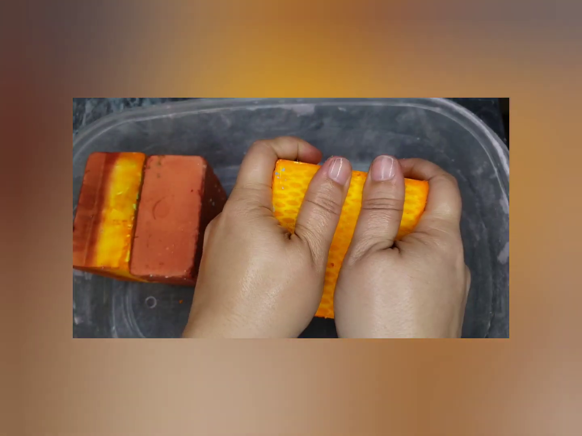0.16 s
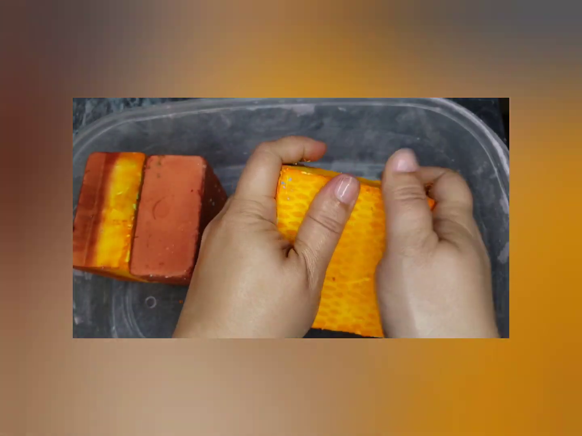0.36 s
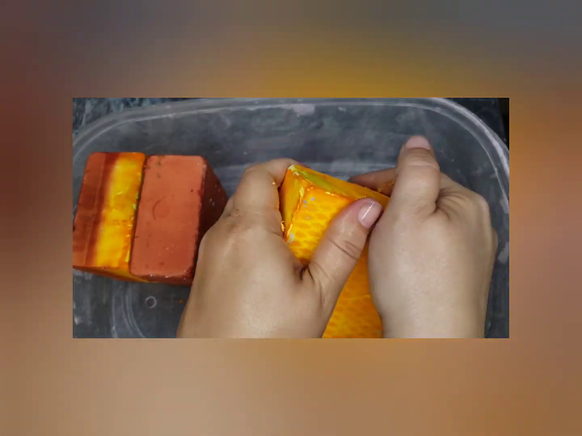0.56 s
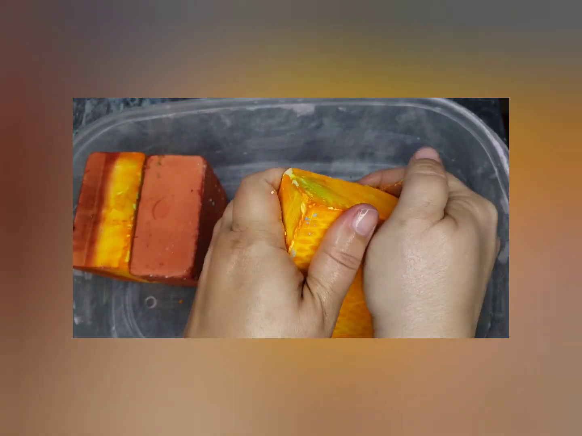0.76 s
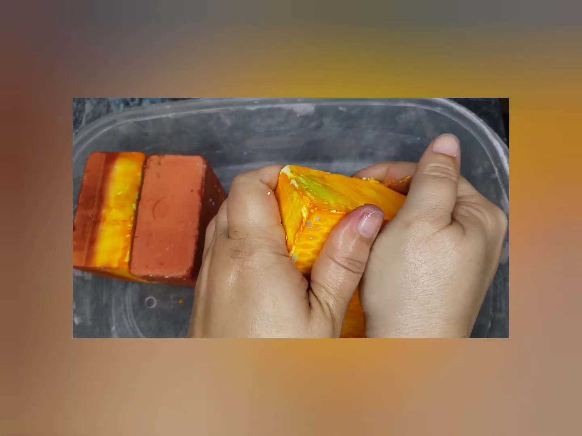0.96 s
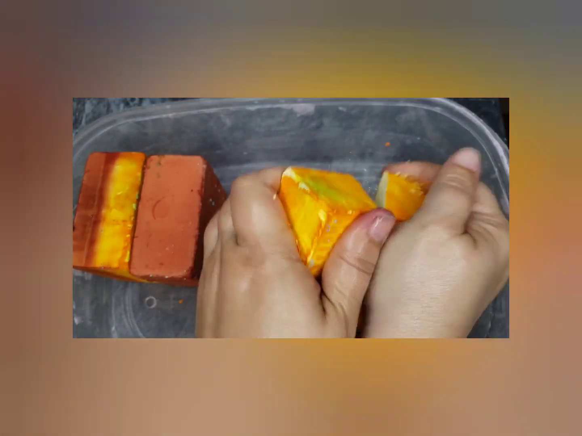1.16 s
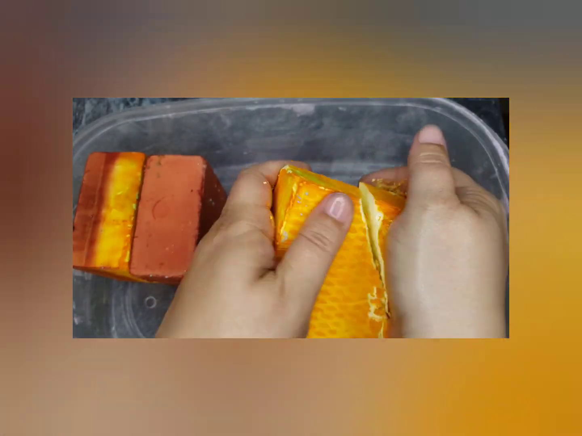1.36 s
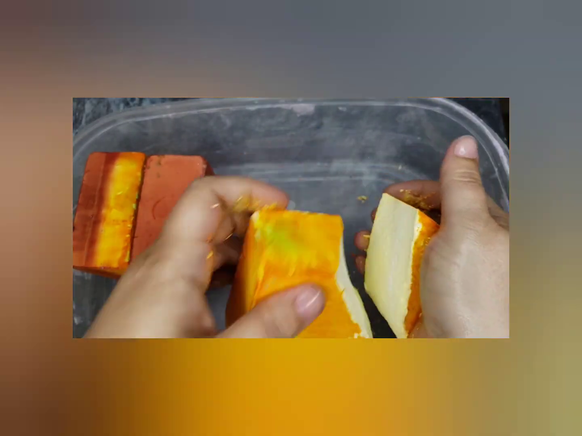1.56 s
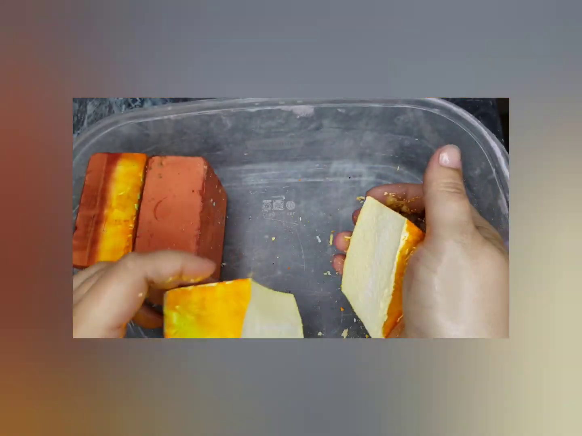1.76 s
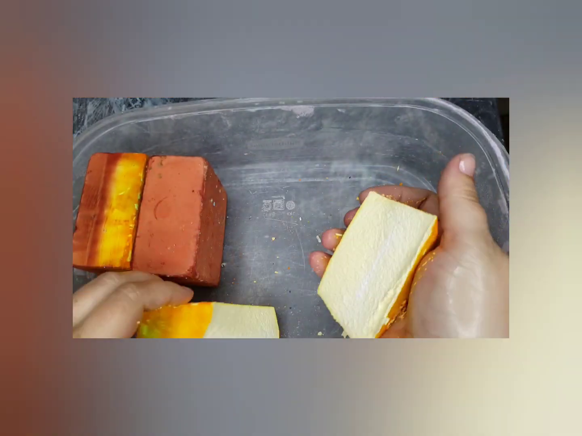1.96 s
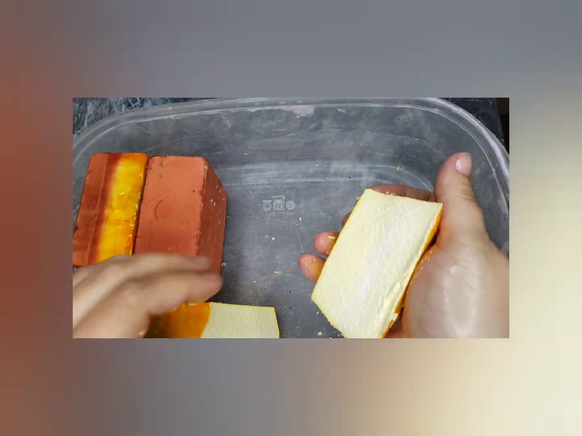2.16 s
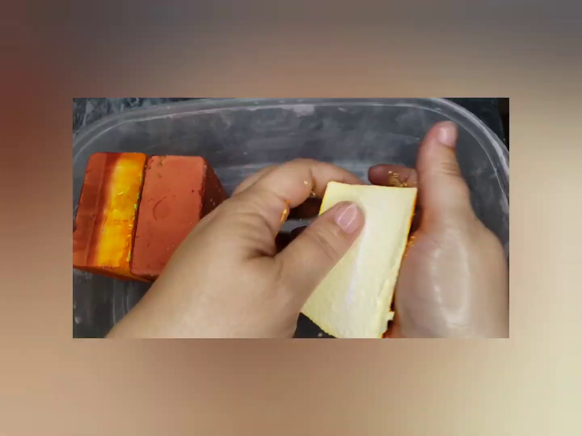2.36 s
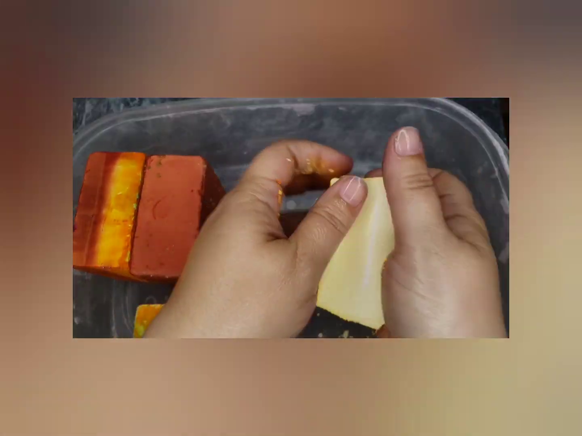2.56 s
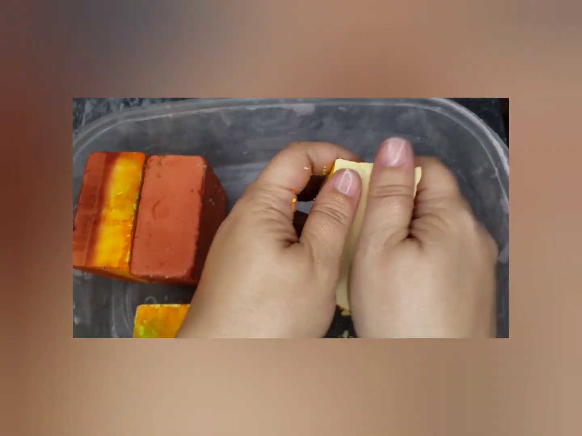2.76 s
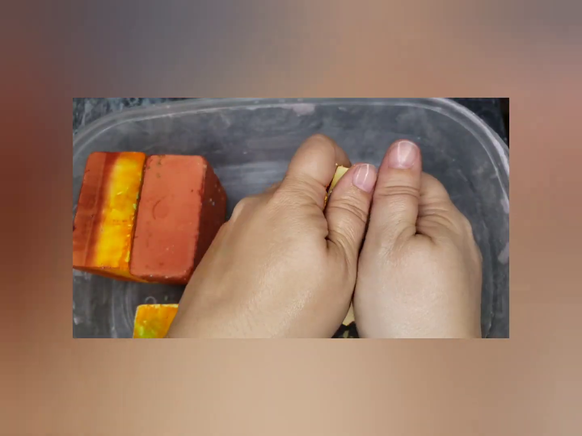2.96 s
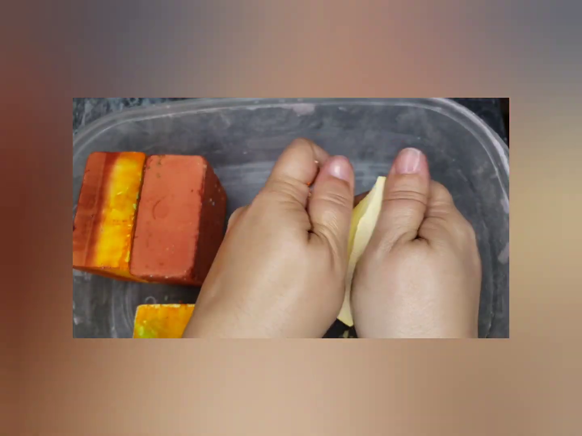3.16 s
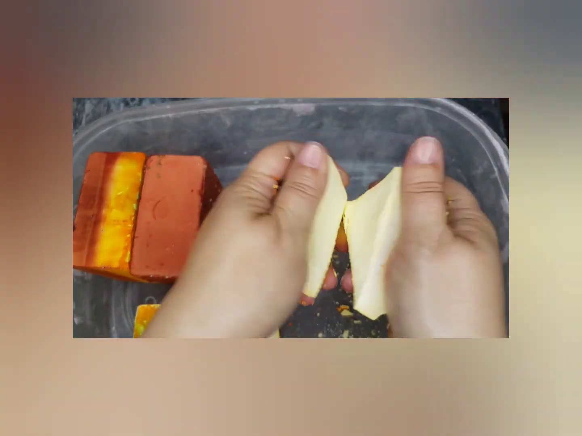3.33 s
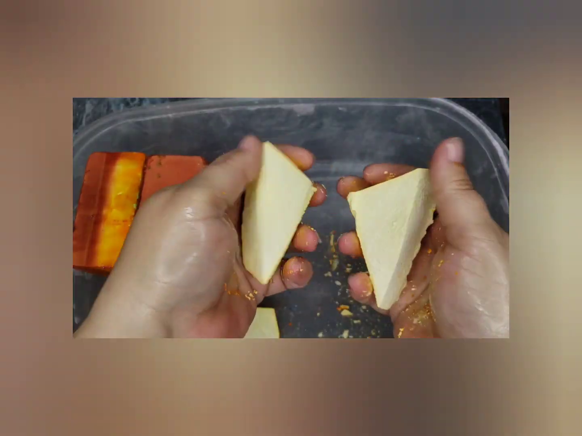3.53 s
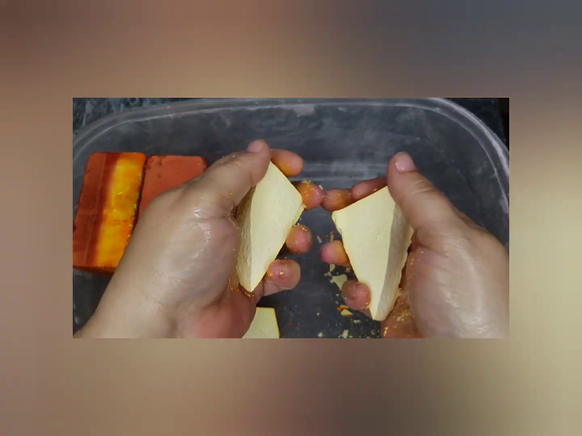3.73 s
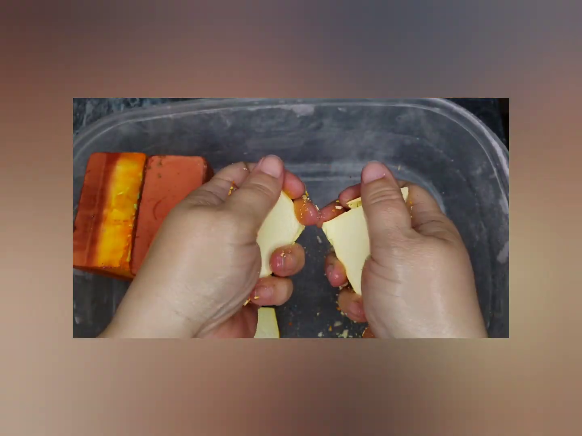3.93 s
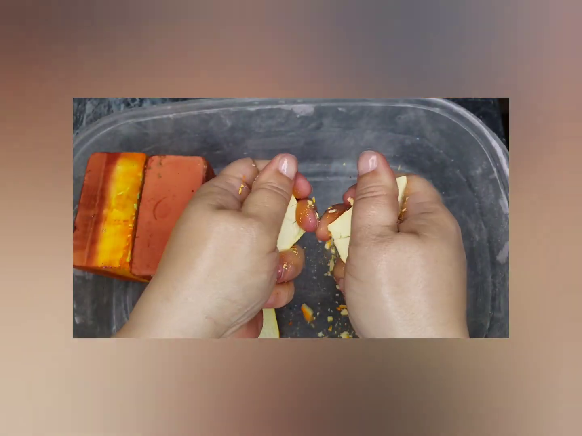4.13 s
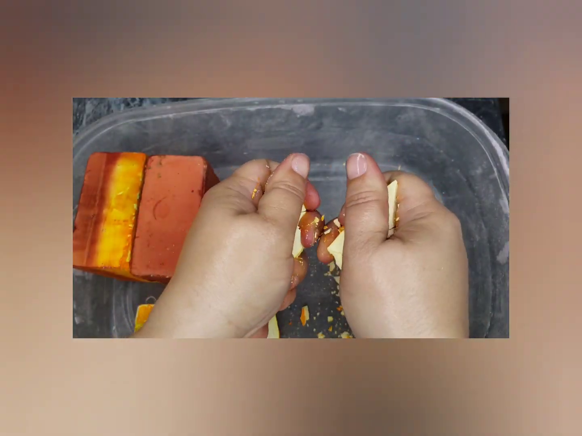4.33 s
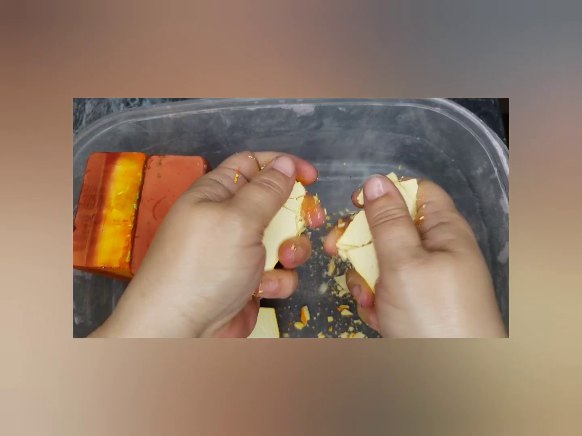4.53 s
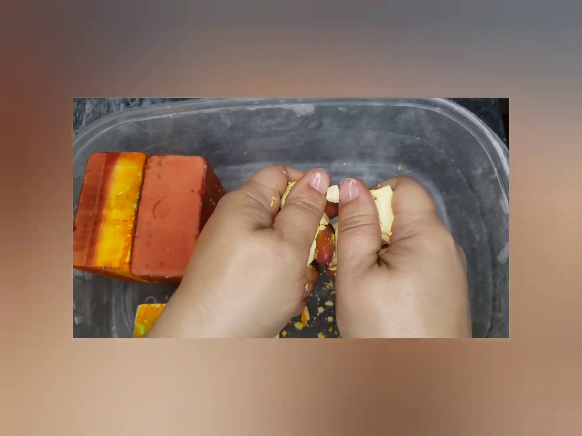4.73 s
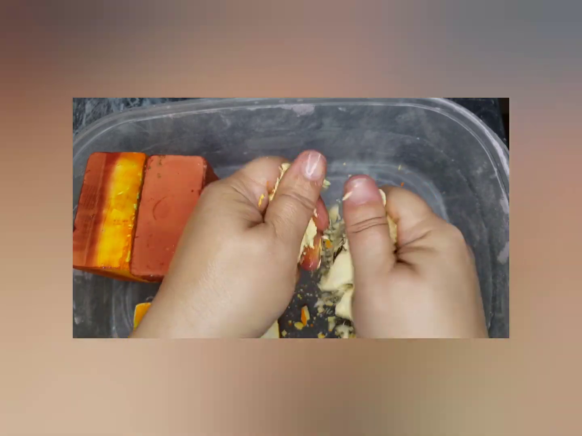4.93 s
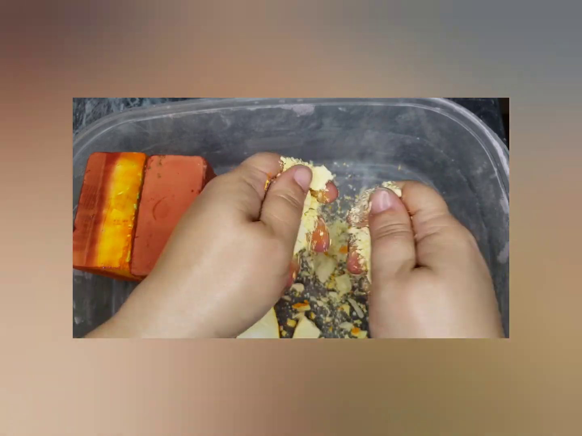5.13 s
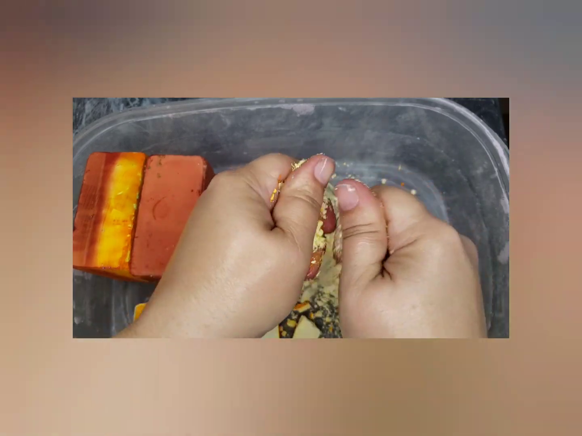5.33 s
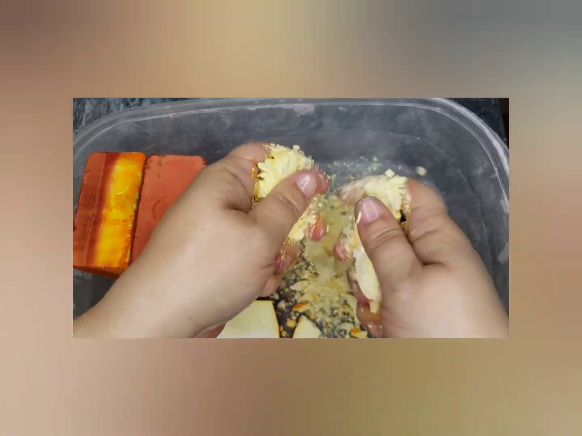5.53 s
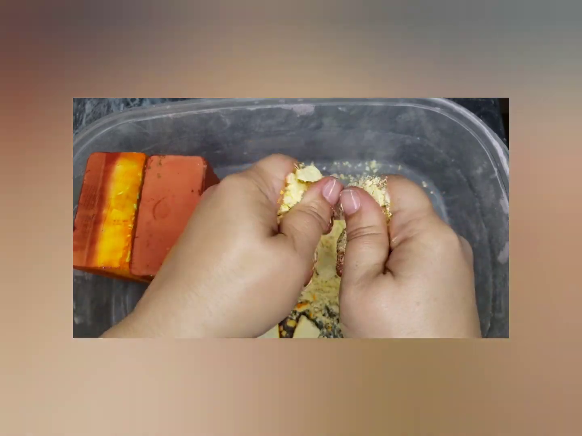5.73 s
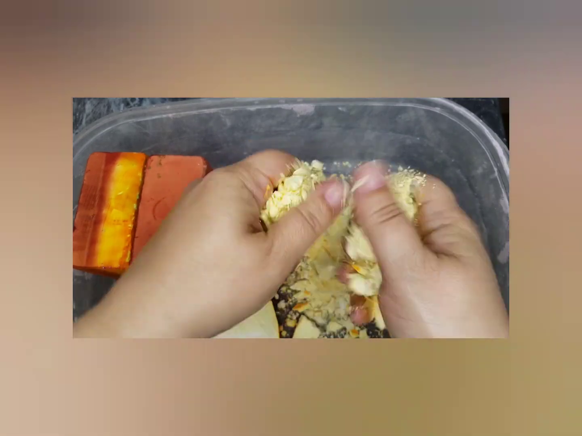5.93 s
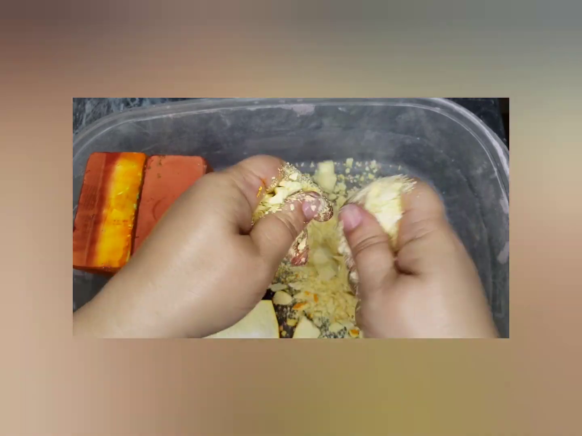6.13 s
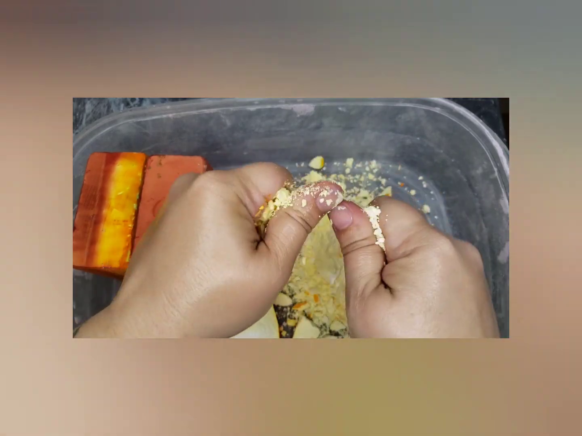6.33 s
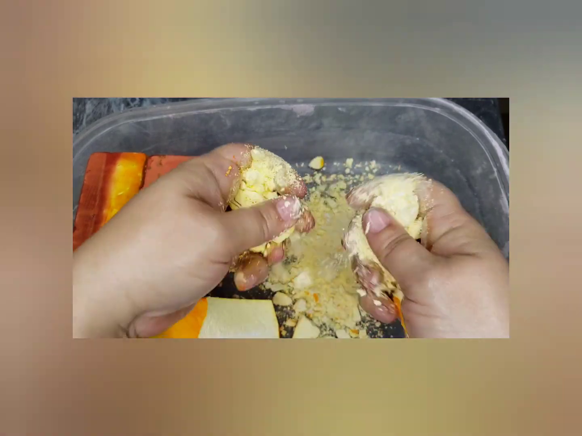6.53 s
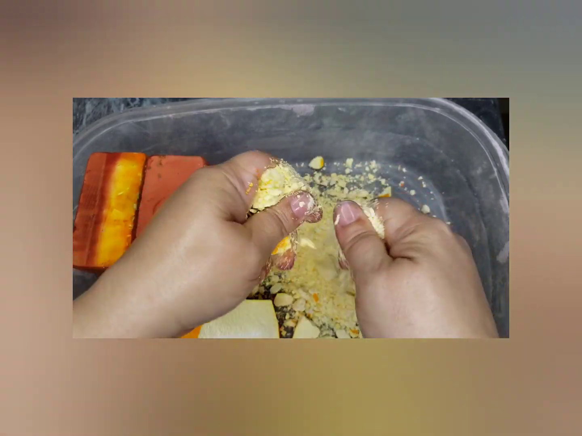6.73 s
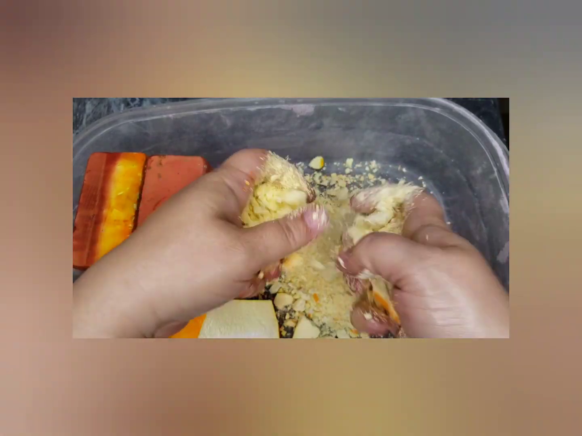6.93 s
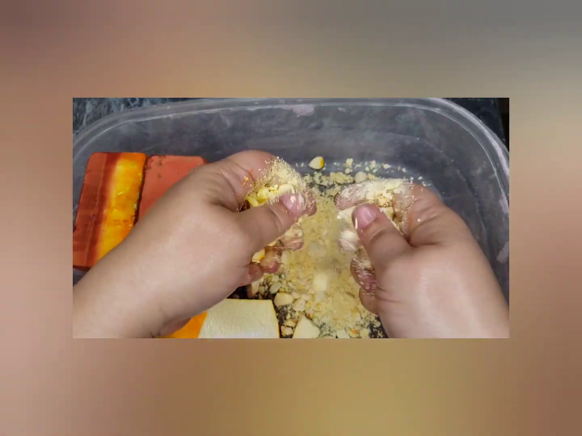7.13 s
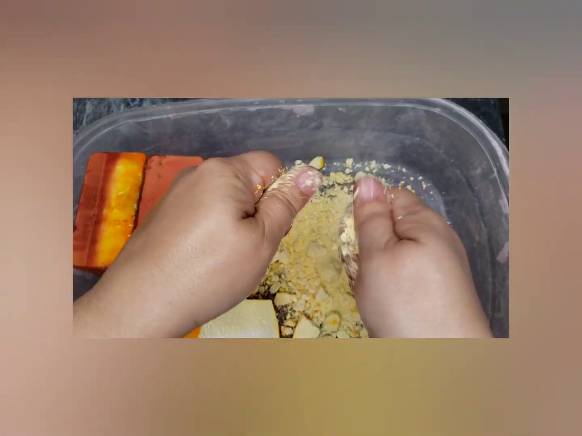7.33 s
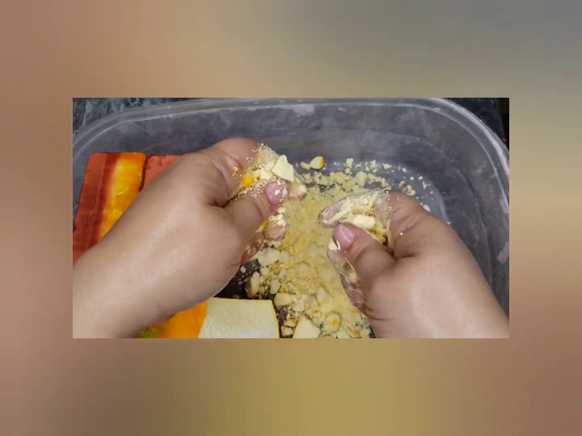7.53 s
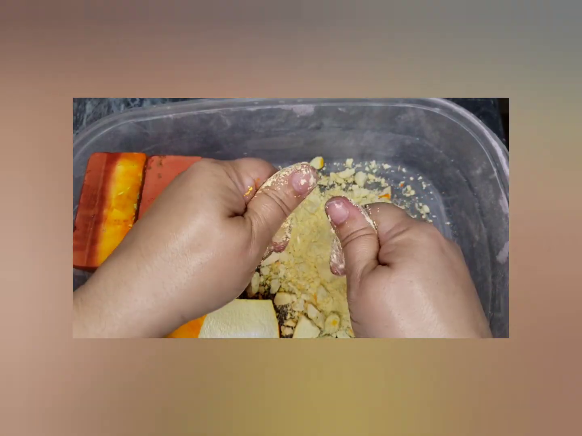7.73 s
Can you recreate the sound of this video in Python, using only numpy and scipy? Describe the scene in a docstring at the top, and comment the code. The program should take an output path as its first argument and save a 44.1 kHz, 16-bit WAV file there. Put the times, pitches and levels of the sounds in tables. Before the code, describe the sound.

Dry chalk snaps sharply in two hands, pieces thump softly in a plastic tub, then get crushed to crumbs with dense gritty crunching over faint hum.

```python
"""Chalk block broken and crushed over a tub

In a small room, close to the microphones and a little to the left, two hands rub and snap a dry chalk block
over a plastic tub, drop one half in, and crush the other to crumbs. Each fracture is a noise burst with a
swing of the hollow hands and a brief ring; squeezes are grains of grit, finger strokes swelling hiss.
Tub modes, wall echoes and a diffuse tail answer; two wavering hum lines, rumble and hiss run underneath."""
import sys
import numpy as np
from scipy import signal
from scipy.fft import rfft, irfft, next_fast_len
from scipy.io import wavfile
from scipy.ndimage import uniform_filter1d, map_coordinates

SR = 44100
rng = np.random.default_rng(int(sys.argv[2]) if len(sys.argv) > 2 else 0)


def pcm_store(signal):
    """Save signal as 16-bit PCM."""
    levels = np.round(np.clip(np.atleast_2d(signal), -1, 1) * 32767)
    wavfile.write(sys.argv[1], SR, levels.astype(np.int16).T)


N = 347940  # length in samples
LEFT_DB = 3.5  # left over right, for most of the close sounds

# Fractures in the hands, energy given as rms over 10 ms, before the lean to the left and the room:
# start_s, hollow_db, ring_db, snap_db, ring_pitch_hz (mostly near 2 kHz)
FRACTURES = [(1.1328, -15, -26.5, -23, 1760), (1.1421, -31, -40, -41.5, 1760),
             (1.5073, -59, -50, -53, 1980), (1.651, -68, -48, -52.5, 2430), (1.801, -52, -40, -53, 1450),
             (1.9805, -50, -46, -50.5, 2225), (2.0319, -48, -36.5, -42, 2170),
             (2.052, -57.5, -44.5, -55, 1996), (3.159, -47, -56, -66, 2250), (3.532, -62, -48, -56, 2006),
             (3.5425, -59.5, -35.5, -52, 2020), (3.5455, -59, -42.5, -48.5, 2150),
             (3.587, -67, -49.5, -70, 1950), (3.9666, -38.5, -33.5, -29, 1930),
             (4.043, -79, -42, -39.5, 2500), (4.119, -60.5, -39.5, -52, 2120),
             (4.127, -69, -41.5, -49, 2190), (4.1675, -58, -48, -49.5, 2680),
             (4.2146, -61, -47, -47.5, 2050), (4.2875, -64.5, -43.5, -55, 2890),
             (4.4954, -61.5, -48.5, -49, 2450), (4.6694, -59, -40.5, -52.5, 2100),
             (4.7256, -48.5, -37.5, -72, 1980), (4.7468, -53, -42, -41.5, 2430),
             (4.7556, -50, -33, -52, 2100), (4.9285, -52, -48, -45, 2310), (4.9385, -67, -45, -43, 2520),
             (4.962, -50.5, -33, -46.5, 2370), (5.0018, -42.5, -37, -50.5, 2060),
             (5.0494, -28, -36.5, -54, 1700), (5.0866, -46, -42, -45, 1940),
             (5.0944, -61, -33, -41.5, 2100), (5.124, -24, -29.5, -39.5, 2150),
             (5.143, -52, -42, -62, 1570), (5.2577, -49, -43, -43, 1970), (5.2688, -49, -47, -43, 2260),
             (5.2899, -69, -40, -49, 2030), (5.374, -52, -47.5, -71, 2250),
             (5.683, -53.5, -43.5, -74, 1970), (5.749, -45.5, -48.5, -48, 1900),
             (5.821, -61, -48, -58.5, 2300), (5.9257, -44, -37, -56, 2050), (5.9329, -41, -41, -70, 1900),
             (5.939, -37.5, -31, -54.5, 2100), (6.006, -51, -32.5, -61, 2140),
             (6.01, -49, -33.5, -50.5, 2300), (6.05, -42, -44, -68, 1310), (6.0653, -44, -32.5, -57, 2140),
             (6.0839, -39.5, -39.5, -56, 2010), (6.1877, -34, -31, -60, 1330), (6.197, -37, -45, -66, 1750),
             (6.5436, -41, -35.5, -50, 2200), (6.583, -47, -61, -57, 1800), (6.6195, -58, -47.5, -57, 2050),
             (7.004, -59.5, -46, -71.5, 2080), (7.026, -45.5, -29, -71, 2080),
             (7.034, -47.5, -50, -70, 1940), (7.0772, -46.5, -46, -71, 2170),
             (7.0866, -53, -40.5, -54, 2030), (7.185, -35.5, -42.5, -50, 2070),
             (7.195, -42.5, -46.5, -54, 1690), (7.2693, -51.5, -42, -44.5, 1770),
             (7.451, -59, -52, -75, 2530), (7.4646, -61, -47, -65, 2060), (7.6554, -58, -49, -46.5, 1850),
             (7.8783, -50.5, -39, -51.5, 2160)]
# Colours of the air in the hands, the ring, the snap and the splinters: freq_hz, level_db
HOLLOW_COLOUR = [(60, -26.5), (150, -0.5), (290, 1.5), (420, 1), (560, -1.5), (680, 5), (850, 1),
                 (1150, -4.5), (2500, -53)]
RING_COLOUR = [(700, -25.5), (1100, -9.5), (1350, -3), (1650, -5.5), (2000, 3.5), (2600, -1), (3200, -7),
               (4500, -23)]
SNAP_COLOUR = [(1800, -32.5), (3000, -9), (3700, -1.5), (4700, -3), (5500, 0), (6300, -4.5), (7200, -1.5),
               (8000, -21), (10000, -26)]
FIZZ_COLOUR = [(6000, -28), (7800, -4), (9000, -12.5), (10300, -6.5), (11800, -2), (14000, -3.5),
               (16000, -8)]
HOLLOW_SCATTER = 0.04  # spread of the hollow's pitch, in natural log
USUAL_RING_HZ = 2150  # ring pitch at which the ring colour stands unshifted
# fizz under a snap of the usual level; harder snaps are brighter, by so many dB for each dB
USUAL_SNAP_DB, FIZZ_DB, FIZZ_GROWS = -43, -6, 0.17


def cracks(split_t60=0.026, puff_t60=0.0024, hollow_hz=555, hollow_t60=0.011, ring_t60=0.007,
           debris_t60=0.14, debris_db=-20, opening=0.00056, variety=0.18, left_leads=0.54):
    """A fracture bursts and sheds debris, puffs the hollow of the hands, and rings briefly."""
    out, t = np.zeros((2, N)), np.arange(SR // 12) / SR
    width = 0.8

    def fade(t60):
        return amp(-60 * t / t60)

    def sized(x):  # energy as of rms 1 over 10 ms
        return x / np.sqrt(np.sum(x ** 2) / (2 * SR / 100))

    for s, hollow_db, ring_db, snap_db, ring_hz in FRACTURES:
        # the decay of each crack varies a little at random
        stretch = np.exp(variety * np.clip(rng.normal(), -1, 1))
        decay = fade(split_t60 * stretch) + 1.1 * fade(0.004)
        split = pair(len(t), width) * (1 - np.exp(-t / opening)) * decay
        debris = unit(grains(len(t), 4400, 2.7, width)) * fade(debris_t60)
        burst = split + amp(debris_db) * debris

        # the opening gap sucks in air: the hollow of the hands swings for a cycle or two
        turn = 2 * np.pi * hollow_hz * np.exp(HOLLOW_SCATTER * rng.normal()) * t
        lead = left_leads * np.array([[0.5], [-0.5]])  # radians
        swing = -np.sin(turn + lead) * fade(hollow_t60) * (1 - fade(puff_t60))
        breath = pair(len(t), 0.4) * fade(hollow_t60 * 2.5)
        hollow = colour(sized(swing) + 0.6 * sized(breath), HOLLOW_COLOUR)

        # the ring has a random phase in each channel, and its colour shifts with its pitch
        phase = 2 * np.pi * ring_hz * t + rng.normal(size=(2, 1))
        shifted_colour = [(hz * ring_hz / USUAL_RING_HZ, db) for hz, db in RING_COLOUR]
        ring = colour(sized(np.sin(phase) * fade(ring_t60)) + 5.5 * sized(burst), shifted_colour)

        snap = colour(burst, SNAP_COLOUR)
        body = amp(hollow_db) * sized(hollow) + amp(ring_db) * sized(ring) + amp(snap_db) * sized(snap)
        fizz_db = snap_db + FIZZ_DB + FIZZ_GROWS * (snap_db - USUAL_SNAP_DB)
        fizz = amp(fizz_db) * sized(colour(burst, FIZZ_COLOUR))
        add(out, s, lean(LEFT_DB) * body + fizz)
    return out


# Colours of the muffled crunch, the grit, the dust (also in ticks and rubs) and the strain:
# freq_hz, level_db
CRUNCH_COLOUR = [(60, -12), (130, 5), (250, -4), (340, -0.5), (470, -5.5), (570, 1.5), (700, 0),
                 (900, -7.5), (1300, -10.5), (2500, -35.5)]
GRIT_COLOUR = [(400, -1.5), (1000, 0.5), (1350, 6.5), (1600, 5), (2000, 12), (2500, 8), (3000, 7),
               (3700, 4.5), (5000, 2), (7200, -2.5), (9000, -54.5)]
DUST_COLOUR = [(500, -16), (1500, -18), (2100, -3.5), (3400, -1.5), (4600, -12.5), (6000, 0.5), (7100, 3.5),
               (8000, -5), (9300, -5.5), (12000, -1.5), (16000, -1.5)]
SWAY_COLOUR = [(20, -39), (40, -10), (70, 6), (110, -4), (250, -3.5)]
POWDER_DB = -6.5  # hiss of powder against the grit
SWAY_DB = -5.5  # low rumble of the straining hands, against the crunch
CLUMP_DB, CLUMP_RATE = 1.7, 130  # unevenness of the crunch: depth in dB, knots per s


def crumbling():
    """Squeezed crumbs give way: muffled clumps inside the fists, fine crackle and powder hiss outside."""
    inside, outside = squeezing()
    clumps = unit(amp(CLUMP_DB * wobble(CLUMP_RATE)))
    ruptures = crackle()
    crunch = unit(colour(grains(N, 3500, 3, 0.35), CRUNCH_COLOUR))
    # the colour of the grit keeps shifting from crumb to crumb
    grit = colour(ruptures * grains(N, 16000, 2.2, 0.8), GRIT_COLOUR)
    grit = unit(patchy(grit, 2.2, 1000, 0.009))
    powder = colour(np.sqrt(ruptures) * grains(N, 12000, 3, 1), DUST_COLOUR)
    powder = amp(POWDER_DB) * unit(powder)
    sway = amp(SWAY_DB) * unit(colour(pair(N, 0.14), SWAY_COLOUR))
    fists = inside * (clumps * crunch + sway) + outside * grit
    return lean(LEFT_DB) * fists + lean(1.3) * outside * powder


# The fingers bear down and the chalk crumbles: start_s, length_s, crunch_db (muffled), grit_db
SQUEEZES = [(1.633, 0.14, -81.5, -64), (3.799, 0.11, -63, -78.5), (4.113, 0.064, -59.5, -50.5),
            (4.186, 0.13, -75, -56), (4.479, 0.17, -68, -51.5), (4.714, 0.14, -67.5, -55),
            (4.901, 0.13, -56.5, -51.5), (5.025, 0.18, -50, -46), (5.084, 0.047, -52, -42),
            (5.255, 0.018, -45.5, -69), (5.333, 0.32, -62, -56.5), (5.721, 0.16, -63, -57.5),
            (5.912, 0.047, -46, -57), (5.99, 0.16, -54, -53), (6.152, 0.11, -48, -59),
            (6.256, 0.056, -56, -53), (6.397, 0.11, -61.5, -61), (6.52, 0.098, -50.5, -53),
            (6.65, 0.12, -58, -60.5), (6.936, 0.19, -54.5, -57), (7.161, 0.071, -51, -58),
            (7.439, 0.13, -59, -56), (7.585, 0.14, -59, -57.5), (7.747, 0.2, -53, -64.5)]
# Chalk lying loose in the hands: time_s, share (0 to 1)
LOOSE_CHALK = [(4.1, 0.15), (5.2, 0.55)]
SQUEEZE_ATTACK_S, SQUEEZE_RELEASE_S = 0.0039, 0.015
TRICKLE_DB, TRICKLE_S = -14, 1  # loose grit runs on after the fists relax; level for a share of 1
SHED_DB, SHED_S = -20.5, 0.021  # crumbs off a fresh break, against its ring


def squeezing():
    """Strength of the crunch inside the fists and of the grit outside, which trickles on and is shed by breaks."""
    inside, outside = np.zeros((2, 1, N))
    for s, length, crunch_db, grit_db in SQUEEZES:
        effort = effort_of(s, length, SQUEEZE_ATTACK_S, SQUEEZE_RELEASE_S)
        loose = np.interp(s, *np.transpose(LOOSE_CHALK))
        trickle = loose * amp(TRICKLE_DB) * effort_of(s, length, SQUEEZE_ATTACK_S, TRICKLE_S)
        inside = np.hypot(inside, amp(crunch_db) * effort)
        outside = np.hypot(outside, amp(grit_db) * np.maximum(effort, trickle))
    # every fracture lets go a short shower of grit
    shower, t = np.zeros((1, N)), np.arange(SR // 5) / SR
    for s, _, ring_db, *_ in FRACTURES:
        add(shower, s, amp(ring_db + SHED_DB) * np.exp(-t / SHED_S)[None])
    return inside, np.hypot(outside, shower)


def effort_of(s, length, attack, release):
    """Attack, hold and release of an effort that starts at s."""
    t = np.maximum(np.arange(N) / SR - s, 0)
    return (1 - np.exp(-t / attack)) * np.exp(-np.clip((t - length) / release, 0, 20))


CRACKLE_RATE, CRACKLE_SPREAD_DB, CRACKLE_S = 950, 3.8, 0.0016  # ruptures per s, size spread, decay


def crackle():
    """Level of overlapping tiny ruptures: each starts at once and dies within a few ms."""
    size = amp(CRACKLE_SPREAD_DB * np.minimum(rng.exponential(size=N), np.pi))
    starts = size * (rng.random(N) < CRACKLE_RATE / SR)
    power = signal.lfilter([1], [1, -np.exp(-2 / (CRACKLE_S * SR))], starts ** 2)
    return unit(np.sqrt(power))


# Flakes split off with a flat, crisp tick, energy as rms over 10 ms before the lean: start_s, level_db
FLAKES = [(1.801, -58), (3.807, -52.5), (3.832, -52), (3.864, -52), (3.8883, -45), (3.93, -51.5),
          (4.4822, -54.5), (4.5199, -50), (4.542, -47), (4.557, -45.5), (4.5835, -54), (4.631, -50),
          (4.8, -49.5), (4.835, -48), (4.8864, -45), (4.922, -47), (5.026, -50), (5.609, -55), (5.646, -50),
          (5.7677, -64), (5.861, -52.5), (6.2533, -44.5), (6.2767, -63), (6.304, -53.5), (7.1746, -44.5),
          (7.195, -47)]


def ticks(t60=0.014, grit_db=-1):
    """A flake splits off without a ring: one short noise burst with the colours of grit and dust."""
    out, t = np.zeros((2, N)), np.arange(SR // 50) / SR
    for s, db in FLAKES:
        burst = pair(len(t), 0.9) * amp(-60 * t / t60)
        dust = unit(colour(burst, DUST_COLOUR))
        grit = amp(grit_db) * unit(colour(burst, GRIT_COLOUR))
        # the burst lasts 20 ms: 1 / sqrt(2) gives its energy over 10 ms
        add(out, s, amp(db) / np.sqrt(2) * unit(dust + grit))
    return lean(LEFT_DB) * out


# Chalk faces sliding over skin or each other, close up, levels before the flutter and the lean:
# start_s, length_s, rise_s, crunch_db, grind_db, snap_db, fizz_db
SCRAPES = [(0.335, 0.049, 0.002, -62.5, -69, -49.5, -44.5), (0.452, 0.048, 0.017, -74, -73, -54, -48),
           (0.591, 0.025, 0.011, -65.5, -72, -53, -47.5), (1.15, .024, .002, -44.5, -45.5, -49, -49),
           (1.181, 0.022, 0.0085, -53, -49.5, -41.5, -39),
           (1.619, 0.099, 0.0055, -83.5, -61.5, -56.5, -60.5), (1.801, 0.026, .002, -57.5, -46.5, -52, -71),
           (1.886, 0.013, 0.0013, -48.5, -56, -54, -69), (1.976, 0.02, .003, -42.5, -50.5, -50.5, -57),
           (2.831, 0.044, 0.0044, -74.5, -69.5, -76.5, -64), (2.908, 0.037, 0.014, -79.5, -85, -74, -53.5),
           (3.158, 0.026, 0.0047, -41, -44.5, -57, -53), (3.467, 0.045, .008, -81, -90, -83, -57.5),
           (3.538, 0.017, 0.0029, -61.5, -53.5, -60, -58), (3.971, 0.017, .002, -53, -69, -49, -56),
           (4.023, 0.021, .002, -50, -51.5, -43.5, -44), (4.269, 0.026, 0.0057, -80, -65, -50, -61),
           (5.037, 0.016, 0.0054, -32.5, -44, -64, -67.5), (6.216, 0.023, 0.017, -46, -53, -70, -76),
           (5.059, .02, 0.0047, -43, -49, -59, -64), (6.187, .008, 0.0014, -32.5, -42, -60, -68),
           (5.503, 0.032, 0.0076, -59, -42.5, -47, -53), (6.539, 0.0045, 0.0018, -45.5, -46.5, -54, -50)]
# Colour of the grind: freq_hz, level_db
GRIND_COLOUR = [(700, -20), (1000, -6.5), (1400, -5.5), (1750, -2.5), (2100, 3), (2500, 3), (2900, -9.5),
                (4000, -23)]
FLUTTER_DB = 1.3  # depth of the flutter in scrapes and rubs


def scrapes(release=0.015):
    """Sliding faces gather speed, shear off dense fine grains, and come to rest."""
    out = np.zeros((2, N))
    # colour, stereo width and lean in dB of each layer
    layers = [(CRUNCH_COLOUR, 0.27, LEFT_DB), (GRIND_COLOUR, 0.7, LEFT_DB),
              (SNAP_COLOUR, 0.92, LEFT_DB), (FIZZ_COLOUR, 0.99, 0)]
    for s, length, rise, *levels in SCRAPES:
        t = np.arange(int((length + 0.1) * SR)) / SR
        stroke = (1 - np.exp(-t / rise)) * np.exp(-np.maximum(t - length, 0) / release)
        for db, (points, width, left_db) in zip(levels, layers):
            friction = unit(colour(grains(len(t), 10000, 2.7, width), points))
            add(out, s, amp(db) * lean(left_db) * stroke * friction)
    return amp(FLUTTER_DB * wobble(CLUMP_RATE)) * out


# Fingers shift their grip over the dusty chalk, one arch of hiss a stroke, levels before the flutter
# and the lean: start_s, length_s, level_db
RUBS = [(0.306, 0.21, -61), (0.442, 0.2, -64.5), (0.627, 0.15, -66), (1.249, 0.089, -62),
        (1.318, 0.34, -59.5), (1.608, 0.29, -66.5), (1.885, 0.21, -64), (2.212, 0.06, -62),
        (2.303, 0.094, -64.5), (2.393, 0.043, -54.5), (2.449, 0.13, -58), (2.598, 0.06, -59.5),
        (2.659, 0.18, -61), (2.846, 0.056, -60.5), (2.898, 0.1, -62.5), (3.304, 0.12, -62),
        (3.409, 0.12, -64), (3.55, 0.27, -68.5), (3.796, 0.17, -53.5), (3.947, 0.099, -60),
        (4.381, 0.1, -65), (4.901, 0.045, -57), (5.294, 0.028, -50), (5.55, 0.19, -69),
        (6.831, 0.027, -56.5), (6.895, 0.051, -58), (7.127, 0.13, -57), (7.33, 0.05, -64)]
RUB_ARCH = 0.55  # under 1, a stroke is flat-topped
RUB_TICK_RATE, RUB_TICK_DB = 70, -10  # stray grains under the fingers: per s, dB against the hiss
SKIN_HZ, SKIN_SPREAD, SKIN_DB = 6600, 0.097, -17  # each stroke sings a little around a pitch of its own
FLUTTER_RATE = 45  # knots per s


def rubbing():
    """Each finger stroke swells and fades; skin catches and slips, so the hiss flutters; stray grains tick."""
    out = np.zeros((2, N))
    hiss = unit(grains(N, 12000, 3.6, 1.0))
    stray = amp(RUB_TICK_DB) * unit(grains(N, RUB_TICK_RATE, 1.7, 0.93))
    dust = unit(colour(hiss + stray, DUST_COLOUR))
    for s, length, db in RUBS:
        n = int(length * SR)
        speed = np.abs(np.sin(np.linspace(0, np.pi, n))) ** RUB_ARCH
        song_hz = SKIN_HZ * np.exp(SKIN_SPREAD * rng.uniform(-0.47, 1))
        song = amp(SKIN_DB) * slip(n, song_hz)
        add(out, s, amp(db) * speed * (dust[:, round(s * SR):][:, :n] + song))
    flutter = amp(FLUTTER_DB * (wobble(FLUTTER_RATE) + wobble(CLUMP_RATE)))
    return lean(4.2) * flutter * out


# A fingertip drags on a smooth face, level before its swell: start_s, length_s, pitch_hz, level_db
SQUEAKS = [(1.46, 0.034, 4840, -63.5), (2.464, 0.08, 3500, -61.5)]


def squeaks():
    """Skin slipping on chalk sings in a narrow, fuzzy band."""
    out = np.zeros((2, N))
    for s, length, hz, db in SQUEAKS:
        n = int(length * SR)
        add(out, s, amp(db) * slip(n, hz) * np.sqrt(np.hanning(n)))
    return out


def slip(n, hz):
    """Fuzzy narrow-band noise of skin slipping on chalk, rms 1."""
    band = [(hz / 2, -50), (0.86 * hz, -16), (hz, 0), (1.21 * hz, -16)]
    return unit(colour(pair(n, 0.62), band))


# Soft, heavy bumps that sway the tub, before the lean: start_s, peak_db
BUMPS = [(1.133, -39.5), (1.891, -20), (1.9807, -15), (2.0075, -23.5), (2.04, -27.5), (4.907, -38),
         (5.049, -33), (5.121, -27.5), (6.188, -35), (6.417, -40.5), (6.587, -41), (7.182, -33),
         (7.665, -42), (7.762, -41), (7.83, -42), (7.866, -41)]
# Low modes of the tub: freq_hz, level_db, t60_s
TUB_MODES = [(114.4, 4.5, 0.064), (141.6, -10, 0.28), (72, -14.5, 0.071), (332, -19, 0.031)]


def bumps(contact=0.0089):
    """The floor of the tub sways in a few low modes after a soft push."""
    out, t = np.zeros((2, N)), np.arange(SR // 3) / SR
    push = 1 - np.exp(-(t / contact) ** 2)
    for s, db in BUMPS:
        sway = sum(amp(level - 60 * t / t60) * np.sin(2 * np.pi * hz * (t - contact))
                   for hz, level, t60 in TUB_MODES)
        sway = sway * push
        add(out, s, amp(db) * lean(LEFT_DB) * sway / np.abs(sway).max())
    return out


# Decay of the small room's tail, before the wall ring: freq_hz, t60_s
ROOM_DECAY = [(100, 0.19), (600, 0.21), (2000, 0.21), (7000, 0.26), (16000, 0.031)]
# Echoes off the tub walls: delay_s, level_db
WALL_ECHOES = [(.0024, -21.5), (.0077, -25.5), (.0095, -20), (0.017, -28.5)]


def room(x, wet_db=-16, wall_hz=2020, wall_q=6, wall_db=-6):
    """Quick echoes off the tub walls, then a short diffuse tail in which their thin plastic rings on."""
    hz, t, z = signal.stft(pair(SR // 3, 0.3), SR, nperseg=256)
    decay = amp(-60 * t / along(ROOM_DECAY, hz)[:, None])
    tail = signal.istft(z * decay, SR, nperseg=256)[1]
    # the tail sets in after 1/300 s
    tail = np.pad(tail / np.linalg.norm(tail[0]), ((0, 0), (SR // 300, 0)))
    tail = tail + amp(wall_db) * signal.lfilter(*signal.iirpeak(wall_hz, wall_q, SR), tail)
    echoes = sum(amp(db) * np.pad(x, ((0, 0), (round(delay * SR), 0)))[:, :N]
                 for delay, db in WALL_ECHOES)
    return x + echoes + amp(wet_db) * signal.fftconvolve(x, tail, axes=1)[:, :N]


# Hum and rumble behind, before their wavering and the lean: time_s, low_line_db, upper_line_db, rumble_db
HUM_LEVELS = [(0, -61.5, -67.5, -61.5), (1.5, -60, -61.5, -59), (3.0, -60, -63, -61),
              (3.6, -62.5, -74, -61.5), (4.6, -60, -68, -58.5), (5.6, -58.5, -63.5, -60.5),
              (7.3, -59, -75, -59), (7.89, -54.5, -93, -57)]
# Colours of the dull rumble and the faint hiss: freq_hz, level_db
RUMBLE_COLOUR = [(20, -20.5), (40, 1), (70, 0), (100, -2.5), (160, -5), (230, -7), (340, -17), (600, -26)]
AIR_COLOUR = [(100, 2), (340, 3), (450, -8), (700, -7), (1000, -12.5), (1800, -18), (3000, -9.5),
              (4200, -22.5), (7000, -23.5), (9000, -34.5), (12000, -21), (16000, -20.5)]


def background():
    """Two hum lines wavering in phase and level over the dull rumble and faint hiss of the room."""
    low_db, upper_db, rumble_db = curves(HUM_LEVELS)
    t = np.arange(N) / SR

    def line(hz, drift):  # drift in radians
        return np.sqrt(2) * np.sin(2 * np.pi * hz * t + drift * wobble(6)) * amp(2.2 * wobble(7))

    hum = amp(low_db) * line(146.5, 1.0) + amp(upper_db) * line(284, 0.7)
    rumble = amp(rumble_db + 1.4 * wobble(4)) * unit(colour(pair(N, 0.26), RUMBLE_COLOUR))
    hiss = amp(-65.0) * unit(colour(pair(N, 0.99), AIR_COLOUR))
    return lean(LEFT_DB) * (hum + rumble + hiss)


def amp(db):
    """Decibels to gain."""
    return 10 ** (np.asarray(db) / 20)


def unit(x):
    """Scale to rms 1."""
    return x / np.sqrt(np.mean(x ** 2) + 1e-20)


def along(points, hz):
    """Interpolate (Hz, value) points on a log frequency axis."""
    f, v = np.transpose(points)
    return np.interp(np.log(hz + 1), np.log(f + 1), v)


def curves(rows):
    """One value per sample for each column after the time."""
    s, *cols = np.transpose(rows)
    return [np.interp(np.arange(N) / SR, s, c) for c in cols]


def wobble(rate):
    """A smooth random curve, rate knots a second."""
    knots = rng.standard_normal(int(N * rate / SR) + 4)
    return map_coordinates(knots, [np.arange(N) * rate / SR])


def colour(x, points, size=4096):
    """Causal filter with the gain of the (Hz, dB) points, closing above the last one."""
    hz = np.fft.rfftfreq(size, 1 / SR)
    closed = points + [(2 * points[-1][0], -90)]
    # folding the cepstrum onto positive times makes the response minimum-phase
    cepstrum = irfft(np.log(amp(along(closed, hz))))
    cepstrum[1:size // 2] *= 2
    cepstrum[size // 2 + 1:] = 0
    response = irfft(np.exp(rfft(cepstrum)))[:size // 2]
    return signal.fftconvolve(x, response[None], axes=1)[:, :x.shape[1]]


def patchy(x, depth_db, wide_hz, long_s):
    """The colour of x drifts: patches of random gain, so wide and so long."""
    z = signal.stft(x, nperseg=256)[2]
    hop_s, step_hz = 128 / SR, SR / 256
    field = rng.standard_normal(z.shape[1:])
    for _ in range(2):
        field = uniform_filter1d(field, round(wide_hz / step_hz), 0)
        field = uniform_filter1d(field, round(long_s / hop_s), 1)
    return signal.istft(z * amp(depth_db * unit(field)), nperseg=256)[1][:, :N]


def pair(n, width):
    """White stereo noise; width is side over mid."""
    mid, side = rng.standard_normal((2, n))
    return np.array([mid + width * side, mid - width * side])


def grains(n, rate, spread_db, width):
    """Tiny ruptures at random moments, rate a second, a few of them much bigger than the rest."""
    size = amp(spread_db * np.minimum(rng.exponential(size=n), np.pi))
    return pair(n, width) * size * (rng.random(n) < rate / SR)


def lean(db):
    """Left and right gains for a level difference."""
    return amp([[db / 2], [-db / 2]])


def add(track, s, x):
    """Mix x into the track at time s."""
    start = round(s * SR)
    track[:, start:start + x.shape[1]] += x[:, :max(N - start, 0)]


def scene():
    """Chalk and tub close by and a little to the left, the hum behind."""
    # the colour of the friction shifts as the contact moves over the chalk
    friction = patchy(scrapes() + rubbing(), 2.2, 700, 0.035)
    hands = cracks() + ticks() + friction + squeaks() + crumbling()
    return room(hands) + bumps() + background()


TOP_HZ = 16100  # middle of the 500 Hz wide slope at the top of the band


def record(dry):
    """The microphones shed the deepest bass; the recorder clips at full scale and cuts above its band limit."""
    size = next_fast_len(N + SR // 2)
    keep = np.clip((TOP_HZ - np.fft.rfftfreq(size, 1 / SR)) / 500 + 0.5, 0, 1)
    heard = signal.sosfilt(signal.butter(2, 34, "highpass", fs=SR, output="sos"), dry)
    return irfft(rfft(np.clip(heard, -1, 1), size) * keep, size)[:, :N]


dry = scene()
out = record(dry)
pcm_store(out)
```